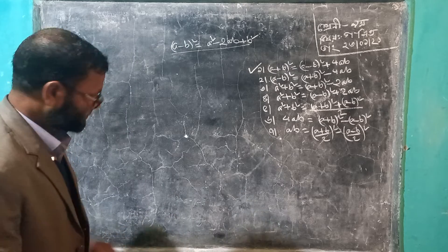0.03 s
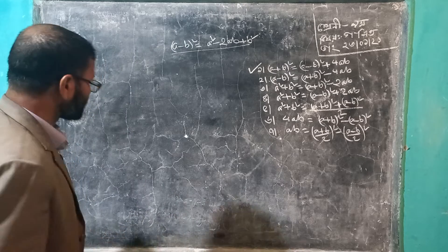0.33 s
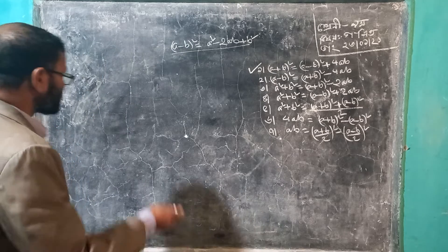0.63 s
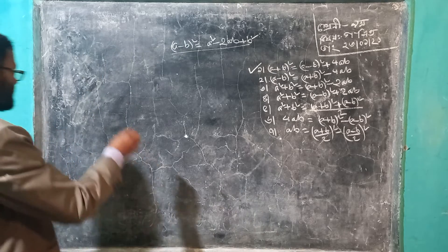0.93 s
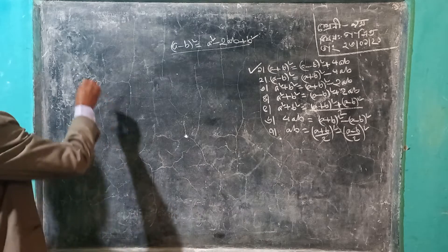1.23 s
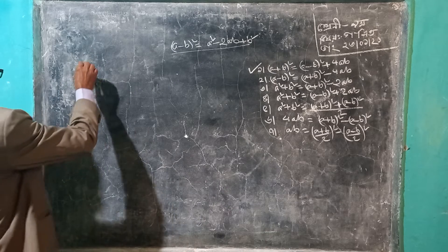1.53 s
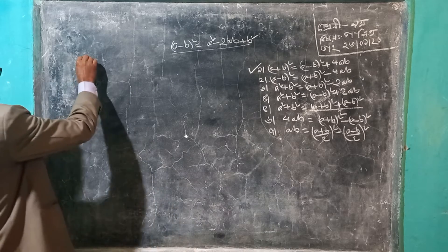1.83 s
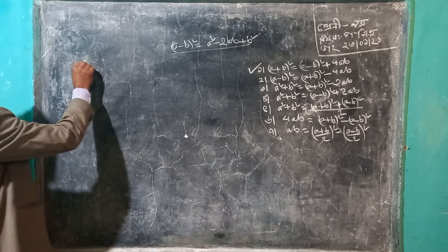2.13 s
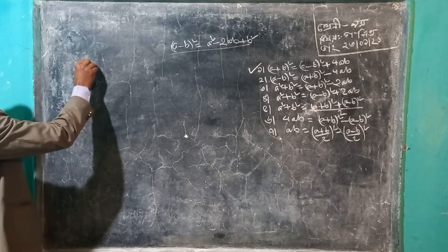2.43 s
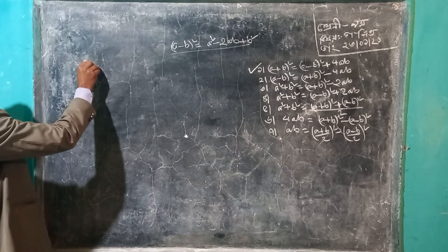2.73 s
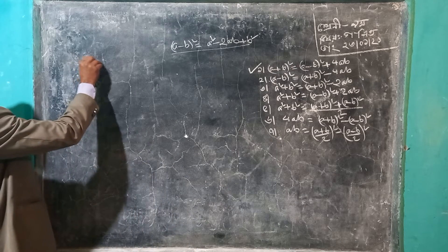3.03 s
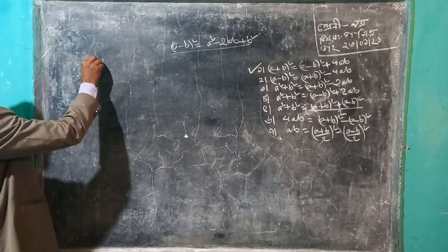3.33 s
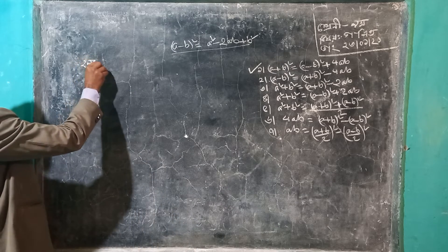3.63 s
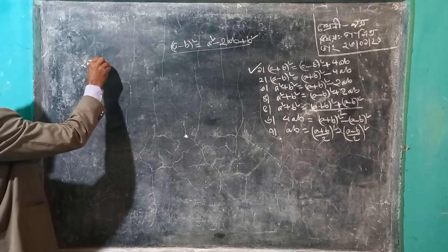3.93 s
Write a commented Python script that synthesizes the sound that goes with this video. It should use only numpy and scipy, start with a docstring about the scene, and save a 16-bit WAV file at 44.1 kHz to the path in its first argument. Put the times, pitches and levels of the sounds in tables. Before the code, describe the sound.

Chalk scrapes and squeaks on a blackboard after a knock on its ledge.

```python
"""Chalk on a wall blackboard, heard from a few metres away in a bare, echoing classroom.
It scrapes in short strokes as it crumbles, then squeaks by stick-slip friction among faint low tones.
Before the writing, something is put on the ledge with a soft bump and a hard knock, exciting the
board's modes, and a sleeve swishes as the arm rises. A low rumble lies under it all."""
import sys
import numpy as np
from scipy import signal
from scipy.fft import rfft, irfft
from scipy.io import wavfile

SR = 44100
rng = np.random.default_rng(int(sys.argv[2]) if len(sys.argv) > 2 else 0)


def output_pcm(signal):
    """Save a mono or channel-first signal as 16-bit PCM at the path in sys.argv[1].

    Samples are clipped to [-1, 1] before scaling.
    """
    pcm = np.clip(np.atleast_2d(signal).T, -1, 1) * 32767
    wavfile.write(sys.argv[1], SR, np.round(pcm).astype(np.int16))


N = 176400
T = np.arange(N) / SR

# Spectra of the four noises. Each row: frequency in Hz, relative spectral density in dB.
RUMBLE_SPECTRUM = [(20, -34.5), (35, -17.5), (55, -3.5), (88, 2.5), (130, -7), (190, -15.5), (300, -10.5),
                   (500, -19.5), (780, -21), (1100, -26.5), (2000, -32), (4000, -34.5), (8000, -41.5),
                   (16000, -47.5)]
CLATTER_SPECTRUM = [(25, -52), (45, -27.5), (90, -7.5), (250, -2.5), (500, 2.5), (900, 0.5), (1400, -1.5),
                    (2200, -8.5), (3600, -15), (5200, -32), (9000, -30.5), (16000, -39)]
CLOTH_SPECTRUM = [(150, -16), (480, 13), (1000, -3.5), (1800, 0), (3200, -7), (5400, 1.5), (8200, 6.5),
                  (11500, 0.5), (16000, -10)]
CHALK_SPECTRUM = [(60, -21), (160, -9.5), (330, -5), (600, -0.5), (1000, -4), (1350, -3.5), (1800, 0.5),
                  (3200, -1), (5000, -1.5), (6400, -5), (8100, -1.5), (10000, -7), (13000, -7),
                  (16000, -21)]
# Blows on board and ledge. Each row: start in seconds, level in dB, contact brightness in Hz,
# relative ring of the board in dB.
IMPACTS = [(0.043, -41.5, 400, -5), (.055, -22.5, 850, 7), (.069, -21.5, 550, -2), (.081, -19.5, 950, -8),
           (.096, -23, 800, -7.5), (.158, -5.5, 5000, -2.5), (.172, -13, 4000, -4.5),
           (.219, -13.5, 2200, -4), (2.464, -38, 3000, -1.5), (3.574, -60, 6000, -20.5)]
# Normal modes of the board. Each row: frequency in Hz, relative level in dB, T60 in seconds.
MODES = [(94.9, -10, 0.73), (138, 0, 0.64), (229.7, -4, 0.51), (308, -6, 0.45), (430.4, -7.5, 0.36),
         (571.5, -6, 0.5), (672, -11, 0.22), (730, -6.5, .4), (787, -2.5, 0.38), (874, -10, .45),
         (1166, -11.5, 0.69), (1252, -3.5, .7), (1624, -12.5, .5), (1908, -12, 0.41)]
# Movements of sleeve and hand. Each row: start and length in seconds, level in dB,
# treble tilt in dB per octave.
SLEEVE_SWISHES = [(.05, .07, -60, -4), (0.78, 0.06, -57.5, -2), (0.945, 0.064, -74, -2),
                  (1.045, 0.103, -68.5, -7), (3.958, .05, -72.5, -9)]
# Chalk strokes. Each row: start, length and attack in seconds, final level in dB, swell up to it in dB,
# boom of the board in dB, treble tilt in dB per octave, resonance of the stick in Hz, its gain in dB.
CHALK_STROKES = [(1.325, 0.025, 0.0078, -32.5, 10, -9.5, -2.5, 2410, 7),
                 (1.358, 0.046, 0.0035, -34.5, -5, 2.5, -.5, 2360, 12.5),
                 (1.411, 0.055, 0.0065, -30.5, -3, -1.5, -2, 2430, 5),
                 (1.619, 0.054, 0.026, -57.5, -15.5, -0.5, -3.5, 8000, -3),
                 (1.803, 0.02, 0.0051, -28, 7.5, -7.5, 1.5, 5050, 11.5),
                 (1.819, 0.071, 0.0076, -27.5, -1, 5, 1, 1840, 5),
                 (2.056, 0.05, 0.027, -67.5, 0.5, -4, 11, 7960, 3),
                 (2.161, 0.048, 0.028, -61.5, 8, -8, 7, 8020, 20),
                 (2.215, 0.084, 0.026, -52, 2.5, -7.5, 2.5, 8290, 2.5),
                 (2.333, 0.069, 0.005, -42.5, 6, -1.5, 2, 7760, 0),
                 (2.475, 0.059, 0.0032, -42.5, -3, -0.5, -3, 8000, 2.5),
                 (2.497, 0.057, 0.0039, -42.5, -8.5, 0.5, 0.5, 4200, 3.5),
                 (2.877, 0.12, 0.016, -67, 1.5, -10, 1.5, 6500, 5),
                 (3.058, .095, 0.036, -62.5, -2, -35, 1.5, 7600, 10),
                 (3.214, 0.24, 0.036, -77.5, -1, -13, 0, 3870, 24),
                 (3.57, 0.035, .004, -64.5, -2.5, -20, -7.5, 1900, 13.5),
                 (3.602, 0.075, 0.035, -64, -6, -9.5, 3, 8100, 5.5)]
# Spells of stick-slip. Each row: start and length in seconds, pitch in Hz, level in dB,
# loss per harmonic in dB.
CHALK_SQUEAKS = [(2.873, 0.078, 2544, -33, 0), (3.025, .03, 2715, -48, 6), (3.31, 0.064, 2742, -42, 7),
                 (3.427, 0.019, 2745, -51, 24), (3.486, .04, 2742, -56, 11.5)]
# Harmonics of a squeak, from the fundamental up. Each entry: relative level in dB.
HARMONICS_DB = [-2.5, -11, -7.5, -24, -14.5]
# Faint tones in the room. Each row: start and length in seconds, pitch in Hz, level in dB.
FAINT_TONES = [(2.905, 0.092, 837, -62), (2.97, 0.041, 800, -63), (3.19, 0.034, 448.6, -64.5),
               (3.28, 0.055, 840, -73.5), (3.47, 0.045, 1186, -73), (3.7, 0.071, 790, -73.5)]
# Reverberation time. Each row: frequency in Hz, T60 in seconds.
REVERB_TIMES = [(100, 0.38), (400, 0.54), (1400, 0.56), (3500, 0.55), (7000, .5), (11000, 0.31),
                (16000, .3)]
# Coherence of the diffuse field. Each row: frequency in Hz, correlation of left and right.
COHERENCE = [(100, 0.84), (240, .85), (480, .55), (800, .1), (1200, -.25), (2200, 0), (16000, -0.15)]


def from_db(db):
    """Amplitude grows tenfold with every 20 dB."""
    return 10 ** (np.asarray(db) / 20)


def unit_power(x):
    """Division by the RMS value gives a mean square of one."""
    return x / np.sqrt(np.mean(x ** 2) + 1e-20)


def at_hz(points, hz):
    """Interpolation of a table on a logarithmic frequency axis."""
    frequencies, values = np.transpose(points)
    return np.interp(np.log(hz), np.log(frequencies), values)


def bins(x):
    """Frequencies of a signal's Fourier components, no lower than 1 Hz."""
    return np.maximum(np.fft.rfftfreq(x.shape[-1], 1 / SR), 1)


def colour(x, db):
    """Filtering multiplies the spectrum by a gain curve; the result has unit power."""
    return unit_power(irfft(rfft(x) * from_db(db), x.shape[-1]))


def drift(rate_hz, size):
    """Low-passed noise wanders at random, with an RMS value of one."""
    noise = rng.standard_normal(size)
    return colour(noise, -20 * np.log10(1 + (bins(noise) / rate_hz) ** 2))


def gate(t, length, attack, release):
    """An envelope rises smoothly, holds, then decays exponentially."""
    rise = np.sin(np.pi / 2 * np.clip(t / attack, 0, 1)) ** 2
    return rise * np.exp(-np.maximum(t - length, 0) / release)


def add(out, start, x):
    """Superposition: a sound adds to the mix from its start in seconds."""
    i = int(np.clip(start * SR, 0, N - 1))
    out[i:i + len(x)] += x[:N - i]


def treble_octaves(hz, corner_hz=3150):
    """A spectral tilt acts on the octaves above its corner."""
    return np.log2(np.maximum(hz / corner_hz, 1))


def diffuse_noise(size):
    """A diffuse field is alike at two points in the bass and nearly unrelated in the treble."""
    noise = rng.standard_normal((2, size))
    alike = at_hz(COHERENCE, bins(noise))
    mid = rfft(noise[0]) * np.sqrt(1 + alike)
    side = rfft(noise[1]) * np.sqrt(1 - alike)
    return unit_power(irfft(np.array([mid + side, mid - side]), size))


def rumble(level_db=-64, waver_db=0.57):
    """Diffuse background noise, strongest in the bass, wavers slightly in level."""
    noise = diffuse_noise(N)
    gain = from_db(level_db - waver_db * drift(rate_hz=4, size=N))
    return colour(noise, at_hz(RUMBLE_SPECTRUM, bins(noise))) * gain


def contact_db(hz, bright_hz, slope=4.4):
    """A soft contact spreads its force in time and so acts as a low-pass filter."""
    return -10 * np.log10(1 + (hz / bright_hz) ** slope)


def ledge_clatter(gain_db=-4.5, t60=0.1, rise_cycles=1.2, size=SR // 4):
    """An impact excites dense, quickly damped vibration; softer contact dulls it and slows its rise."""
    out = np.zeros(N)
    for start, db, bright_hz, _ in IMPACTS:
        noise = rng.standard_normal(size)
        hz = bins(noise)
        burst = colour(noise, at_hz(CLATTER_SPECTRUM, hz) + contact_db(hz, bright_hz))
        envelope = gate(T[:size], 0, rise_cycles / bright_hz, t60 / np.log(1000))
        add(out, start, from_db(db + gain_db) * burst * envelope)
    return out


def resonator(clicks, hz, t60):
    """A damped oscillator answers a unit impulse with a sine decaying from height one."""
    decay = np.exp(-np.log(1000) / (t60 * SR))
    step = 2 * np.pi * hz / SR
    return signal.lfilter([0, np.sin(step)], [1, -2 * decay * np.cos(step), decay ** 2], clicks + 1e-18)


def board_ringing(gain_db=-17, top_hz=2600):
    """Impacts set the normal modes in free vibration; the ringing holds nothing above about 2.6 kHz."""
    out = np.zeros(N)
    starts, db, bright_hz, ring_db = np.transpose(IMPACTS)
    for hz, mode_db, t60 in MODES:
        drive_db = db + ring_db + gain_db + mode_db + contact_db(hz, bright_hz)
        clicks = np.zeros(N)
        clicks[(starts * SR).astype(int)] = from_db(drive_db)
        out += resonator(clicks, hz, t60)
    return signal.sosfilt(signal.butter(4, top_hz, fs=SR, output="sos"), out)


def contact_cracks(gain_db=-29, decay_s=0.002, hard_hz=4503, size=SR // 20):
    """A brief contact has a broad spectrum, so only the hardest blows snap."""
    out = np.zeros(N)
    for start, db, bright_hz, _ in IMPACTS:
        hardness_db = contact_db(hard_hz, bright_hz, slope=8)
        snap = rng.standard_normal(size) * np.exp(-T[:size] / decay_s)
        add(out, start, from_db(db + gain_db + hardness_db) * snap)
    return out


def sleeve(edge_s=0.021, size=SR // 3):
    """Sliding friction of cloth on cloth gives soft swishes of broadband noise."""
    out = np.zeros(N)
    for start, length, db, tilt_db in SLEEVE_SWISHES:
        noise = rng.standard_normal(size)
        hz = bins(noise)
        hiss = colour(noise, at_hz(CLOTH_SPECTRUM, hz) + tilt_db * treble_octaves(hz))
        add(out, start, from_db(db) * hiss * gate(T[:size], length, edge_s, edge_s))
    return out


def chalk_scrapes(grains_per_s=6000, spread_db=4, boom_hz=1700, ring_octaves=0.098, size=SR // 2):
    """Crumbling chalk makes shot noise: dense tiny clicks, filtered by the stick and the board."""
    out, t = np.zeros(N), T[:size]
    for start, length, attack, db, swell_db, boom_db, tilt_db, ring_hz, ring_db in CHALK_STROKES:
        clicks = (rng.random(size) < grains_per_s / SR) * rng.choice([-1, 1], size)
        grains = clicks * from_db(spread_db * np.minimum(rng.exponential(1, size), 5))
        hz = bins(grains)
        chalk_db = at_hz(CHALK_SPECTRUM, hz) + tilt_db * treble_octaves(hz)
        board_db = boom_db / (1 + (hz / boom_hz) ** 4)
        stick_db = ring_db / (1 + (np.log2(hz / ring_hz) / ring_octaves) ** 2)
        scrape = colour(grains, chalk_db + board_db + stick_db)
        pressure = from_db(db + swell_db * (np.minimum(t / length, 1) - 1))
        add(out, start, scrape * pressure * gate(t, length, attack, release=0.0082))
    return out


def chalk_squeaks(sharp=0.04, catch_s=0.0053, jitter=0.0043, flutter_db=1.8, size=SR // 4):
    """Stick-slip oscillation gives a harmonic tone that flutters with the grip; light squeaks are purer."""
    out, t = np.zeros(N), T[:size]
    catch = sharp * np.exp(-t / catch_s)   # the pitch starts high and settles as the stick catches
    for start, length, hz, db, loss_db in CHALK_SQUEAKS:
        pitch = hz * (1 + catch + jitter * drift(rate_hz=220, size=size))
        phase = 2 * np.pi * np.cumsum(pitch) / SR
        tone = sum(from_db(db + harmonic_db - k * loss_db) * np.sin((k + 1) * phase)
                   for k, harmonic_db in enumerate(HARMONICS_DB))
        grip = unit_power(from_db(flutter_db * drift(rate_hz=89, size=size)))
        add(out, start, np.sqrt(2) * tone * grip * gate(t, length, attack=0.014, release=0.0047))
    return out


def low_tones(waver=0.019, edge_s=0.013, size=SR // 3):
    """Random frequency modulation makes faint, short tones waver."""
    out = np.zeros(N)
    for start, length, hz, db in FAINT_TONES:
        pitch = hz * (1 + waver * drift(rate_hz=30, size=size))
        tone = np.sqrt(2) * np.sin(2 * np.pi * np.cumsum(pitch) / SR)
        add(out, start, from_db(db) * tone * gate(T[:size], length, edge_s, edge_s))
    return out


def classroom(x, gap_s=0.00098, build_s=0.004, size=SR):
    """Reverberation is convolution with a diffuse tail, each half octave dying at its own rate."""
    noise = diffuse_noise(size)
    spectrum, t = rfft(noise), T[:size]
    band = np.round(2 * np.log2(np.maximum(bins(noise), 90)))
    build = np.clip((t - gap_s) / build_s, 0, 1)
    response = 0
    for k in np.unique(band):
        decay = np.exp(-np.log(1000) * t / at_hz(REVERB_TIMES, 2 ** (k / 2)))
        tail = irfft(spectrum * (band == k), size) * build * decay
        response += unit_power(tail) * np.sqrt(np.mean(band == k) / size)   # equal gain in all bands
    return signal.fftconvolve(x[None], response, axes=1)[:, :N]


def scene(direct_db=-9.5, ringing_to_room_db=-11, pan_db=0.57):
    """An extended source: the board radiates chalk sound from two places, each with its own echoes."""
    clatter, ringing = ledge_clatter(), board_ringing()
    upper, lower = [(chalk_scrapes() + chalk_squeaks()) / np.sqrt(2) for _ in range(2)]
    upper += sleeve()
    lower += clatter
    direct = from_db(direct_db) * (upper + lower) + ringing + contact_cracks()
    echoes = classroom(upper + low_tones()) + classroom(lower + from_db(ringing_to_room_db) * ringing)
    return (direct + echoes) * from_db([[-pan_db], [pan_db]]) + rumble()


def record(dry, low_hz=36, top_hz=15900):
    """Band limiting: the microphone loses the deepest bass, and the top is cut steeply."""
    heard = signal.sosfilt(signal.butter(4, low_hz, "high", fs=SR, output="sos"), dry)
    return signal.sosfilt(signal.ellip(12, .1, 80, top_hz, fs=SR, output="sos"), heard)


dry = scene()
out = record(dry)
output_pcm(out)
```